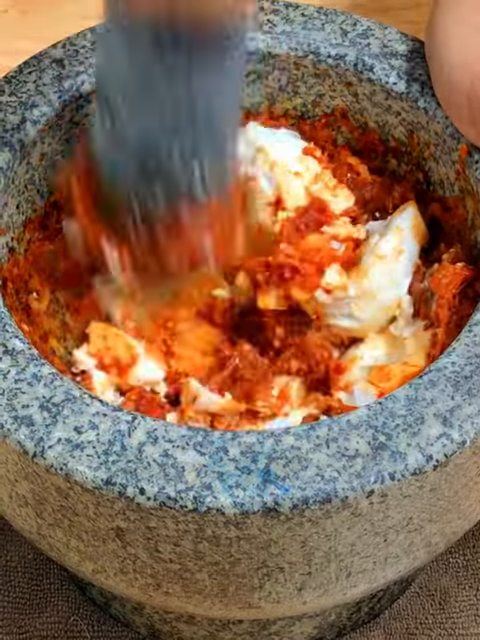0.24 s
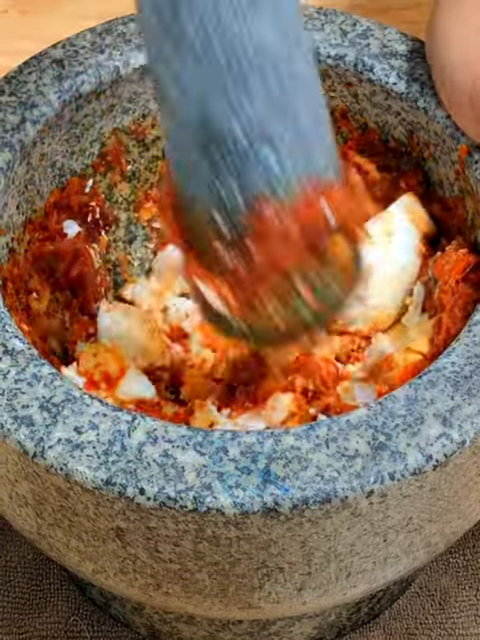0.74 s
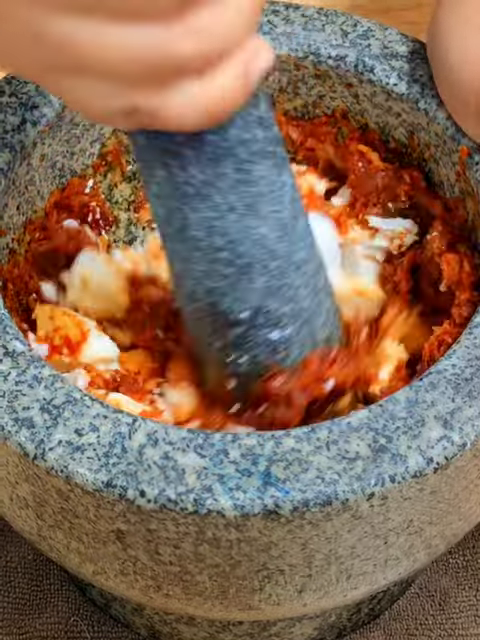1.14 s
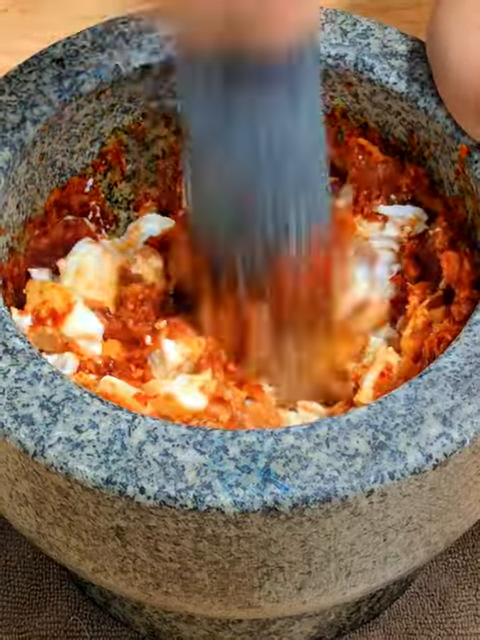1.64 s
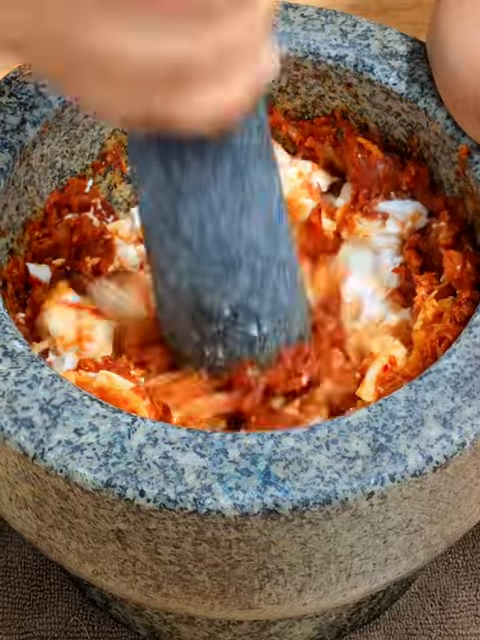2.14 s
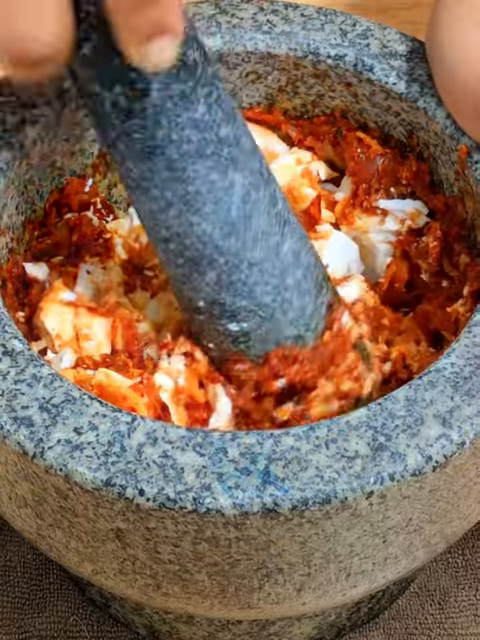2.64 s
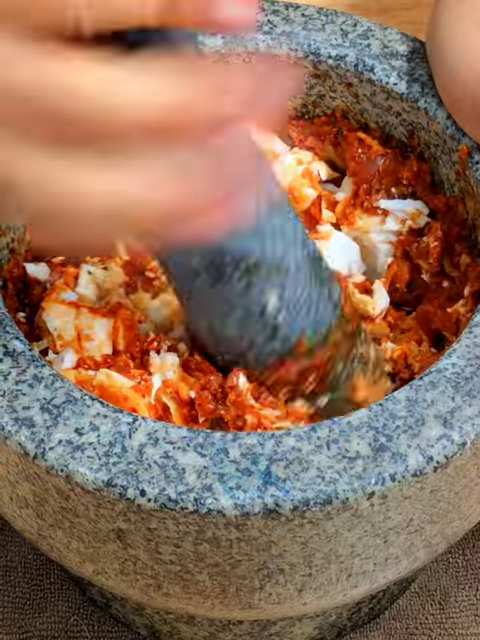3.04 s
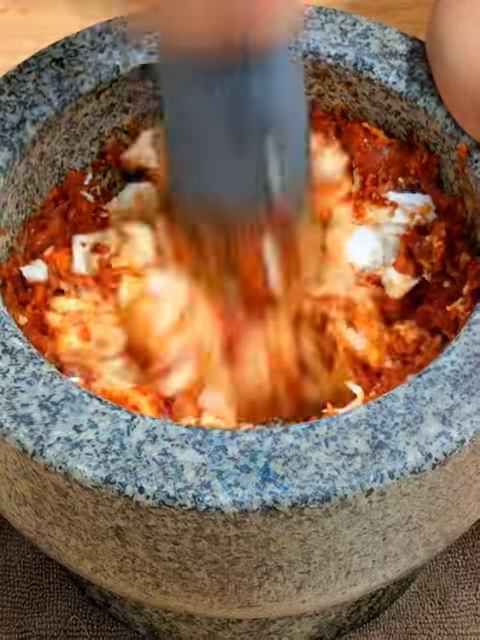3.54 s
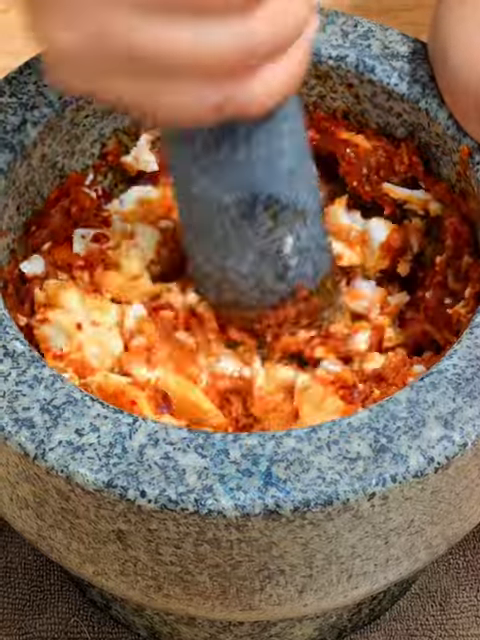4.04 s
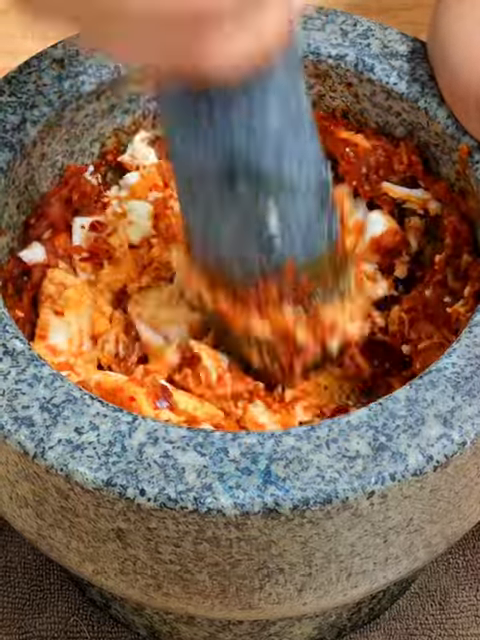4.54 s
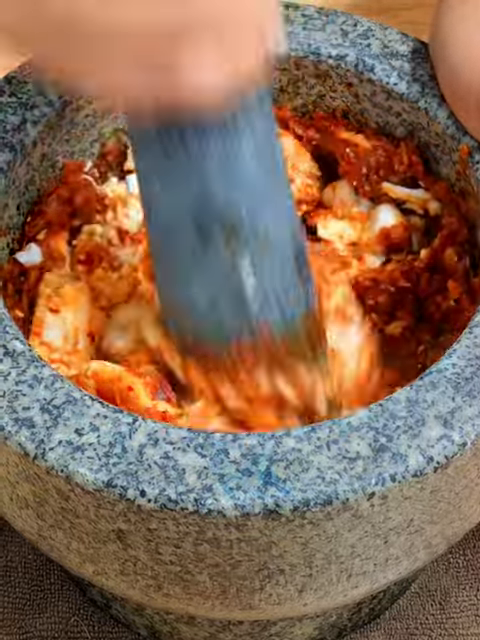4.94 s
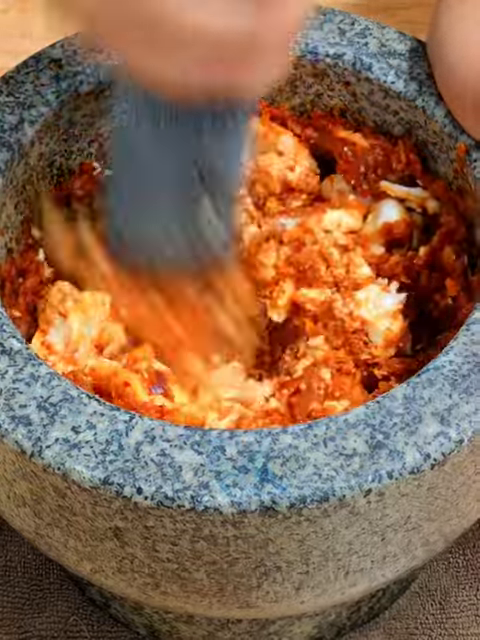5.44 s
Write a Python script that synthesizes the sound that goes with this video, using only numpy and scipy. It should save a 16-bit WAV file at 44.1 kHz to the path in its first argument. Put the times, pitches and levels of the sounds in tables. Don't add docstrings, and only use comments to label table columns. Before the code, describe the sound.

A stone pestle pounds wet, soft paste in a stone mortar, with squishy smacks, dull counter thuds and irregular sharp stone cracks.

```python
import sys
import numpy as np
from scipy import signal
from scipy.fft import rfft, irfft, next_fast_len
from scipy.io import wavfile
from scipy.ndimage import uniform_filter1d

SR = 44100
rng = np.random.default_rng(int(sys.argv[2]) if len(sys.argv) > 2 else 0)


def how_loud(loudness_db):
    steps = np.asarray(loudness_db, float) / 20
    return 10 ** steps


def log_audio(samples):
    frames = np.atleast_2d(samples).T
    limited = np.clip(frames, -1, 1)
    pcm = np.round(limited * 32767).astype(np.int16)
    wavfile.write(sys.argv[1], SR, pcm)


N = 251645

# f/Hz, level/dB per Hz
AIR_SPECTRUM = [(15, -46), (25, -21), (48, -24.5), (192, -8.5), (388, 1.5), (524, -11.5), (669, -10.5),
                (877, -9.5), (978, -13.5), (1930, -18.5), (4130, -31), (14400, -46.5), (16500, -50.5)]
# f/Hz, width/Hz, level/dB
HUM_PEAKS = [(150, 46, -71), (191.8, 12, -71), (264.3, 38, -66), (369.5, 23, -74), (447, 80, -70.5),
             (498, 37, -63)]
# f/Hz, t60/s
ROOM_DECAY = [(300, 0.43), (1000, 0.39), (2000, 0.23), (5000, 0.23), (13000, 0.21)]
# t/s, peak level/dB, deep level/dB, upper level/dB
COUNTER_BLOWS = [(0.166, -43.5, -61, -51), (0.292, -36.5, -51.5, -33.5), (0.478, -39, -44.5, -22),
                 (0.692, -37.5, -62, -48), (0.834, -29.5, -41.5, -23.5), (1.028, -41.5, -55.5, -52),
                 (1.184, -44, -59.5, -68), (1.39, -36, -57, -46.5), (1.529, -30, -48.5, -26.5),
                 (1.696, -40, -47, -23.5), (1.859, -53, -51.5, -29.5), (2.018, -39.5, -52.5, -50),
                 (2.201, -37, -48, -40), (2.369, -41, -59, -49), (2.533, -36, -52.5, -42.5),
                 (3.449, -34, -45.5, -28.5), (3.606, -33.5, -52.5, -38.5), (3.784, -34.5, -58.5, -43.5),
                 (3.899, -38.5, -56.5, -47), (4.062, -40.5, -54, -32.5), (4.156, -41.5, -53, -44.5),
                 (4.369, -41, -51.5, -45.5), (4.523, -38.5, -48, -40.5), (4.688, -39, -55.5, -46.5),
                 (4.847, -32.5, -51, -36.5), (5.067, -39.5, -62, -48), (5.17, -43.5, -58, -51),
                 (5.306, -39, -61, -36.5), (5.475, -32, -47.5, -32.5), (5.669, -37.5, -51, -45)]
# f/Hz, level/dB, t60/s
DEEP_MODES = [(113.5, 1, 0.064), (145.6, 4, 0.11), (186.6, -14, 0.99)]
COUNTER_MODES = [(271.84, 0, 0.48), (261.2, -6, 0.54), (293, -7, 0.4), (363.8, -3, 0.34),
                 (386.2, -6.5, 0.49)]
UPPER_MODES = [(430, -7, .16), (492, -3, .12), (547, 0, .155), (590, -6, .07), (635, -7, .08),
               (716, -8, .09)]
# f/Hz, level/dB per Hz
PASTE_SPECTRUM = [(590, -47), (1000, -2), (1620, -2), (3600, -7), (4750, -4), (7810, -5.5), (9080, -7),
                  (15100, -8), (15800, -22)]
# plunge t/s, plunge fizz level/dB, squeeze delay t/s, squeeze fizz level/dB, smack f/Hz
FIRST_GRIP_STROKES = [(0.115, -56.5, 0.052, -59, 11100), (0.4625, -48, .05, -70, 5040),
                      (.632, -51, 0.041, -55, 5030), (0.809, -50.5, 0.067, -57.5, 8100),
                      (0.9888, -55.5, 0.046, -54.5, 7350), (1.161, -55.5, .047, -52.5, 4040),
                      (1.3297, -49, 0.048, -56.5, 3070), (1.507, -46.5, .035, -73, 7000),
                      (1.679, -56, 0.036, -53, 4470), (1.843, -51, 0.049, -54.5, 7100),
                      (2.003, -57, .043, -56.5, 3060), (2.1697, -52, 0.034, -50.5, 4200),
                      (2.3308, -50, 0.049, -59.5, 3390), (2.4925, -54, 0.048, -65, 3680),
                      (2.6957, -59, 0.058, -70, 10200)]
SECOND_GRIP_STROKES = [(3.099, -63, 0.022, -54.5, 5560), (3.262, -53.5, 0.034, -55, 5300),
                       (3.422, -55, 0.032, -53, 8050), (3.568, -55, 0.059, -53, 5140),
                       (3.745, -52.5, 0.03, -51, 7100), (3.887, -51.5, 0.053, -55, 3600),
                       (4.0355, -57, .059, -53.5, 2970), (4.2026, -53, 0.041, -49.5, 3530),
                       (4.3534, -53, 0.037, -50.5, 5400), (4.510, -54.5, 0.031, -53.5, 4590),
                       (4.648, -58, 0.028, -54, 5070), (4.8215, -54, .047, -52.5, 4650),
                       (4.969, -55.5, 0.044, -55.5, 4760), (5.128, -51.5, 0.058, -53.5, 4660),
                       (5.287, -57.5, 0.07, -56, 9100), (5.6222, -57, 0.027, -50.5, 5670)]
# t/s, fizz level/dB, smack f/Hz, smack above fizz level/dB
STRAY_SMACKS = [(0.644, -54, 5900, 3.5), (0.699, -62, 8000, 12), (1.0161, -71, 7390, 10),
                (1.063, -64, 7900, 18.5), (1.19, -62, 5500, 14), (1.3287, -63, 7700, 18),
                (1.3795, -64, 3100, 19), (3.117, -63.5, 5600, 20), (.004, -63.5, 3300, 13),
                (2.016, -53, 3100, 6), (2.073, -69, 7920, 15), (2.823, -68, 3330, 6),
                (2.929, -65.5, 9000, 6), (3.5957, -52.5, 3080, -7), (3.7765, -60.5, 6850, 25.5),
                (4.0507, -47, 6070, 3), (4.133, -65, 10500, 18), (4.2438, -60.5, 3250, 24),
                (4.3924, -65, 5400, 21), (4.708, -49, 5320, 5), (4.8, -59, 5000, 0), (4.9923, -53, 3220, 5),
                (5.516, -53, 11100, 7), (5.669, -46, 4180, 12.5)]
# t/s, peak level/dB, ring f/Hz, lasting tone relative level/dB
PESTLE_PINGS = [
    (0.2884, -28, 6080, -13),
    (0.4785, -27.5, 6250, -16),
    (1.857, -43.5, 6280, -8),
    (3.4423, -48, 6000, -19),
    (5.2993, -51, 6100, -27),
    (5.471, -17.5, 6100, -27),
]
# f/ring f, level/dB, t60/s
PESTLE_MODES = [(.98, 6, 0.013), (1.002, 0.5, 0.022), (1.03, -2, 0.017), (1.2, -10, 0.0083),
                (.62, -21, .008), (.8, -13, .006), (1.715, -35, .08), (2.11, -23, 0.011),
                (2.57, -21, 0.013)]
# t/s, knock peak level/dB, sharp edge level/dB, bowl level/dB, knock f/Hz
STONE_KNOCKS = [(0.2883, -22.5, -19.5, -42, 1596), (0.4776, -15.5, -10, -19.5, 1508),
                (0.8272, -10.5, -10.5, -16, 1810), (1.523, -13.5, -40, -22.5, 2100),
                (1.6909, -17, -20.5, -24, 1746), (1.858, -24.5, -27.5, -28, 1455),
                (2.172, -70, -43.5, -50, 1910), (2.2035, -67, -44.5, -49, 1880),
                (2.3332, -43.5, -45, -58, 1570), (3.4432, -26.5, -27.5, -27.5, 1360),
                (3.5958, -36.5, -66.5, -40, 1552), (3.745, -38.5, -59, -45, 1670),
                (4.0583, -31.5, -47, -35.5, 1480), (4.5201, -52, -46, -49, 1630),
                (4.841, -59, -57, -50, 1440), (5.2981, -25, -35, -33.5, 1960),
                (5.471, -18.5, -15.5, -31, 1930)]
# f/Hz, level/dB, t60/s
BOWL_MODES = [(905, -11, 0.2), (958, -11.5, 0.23), (1205, -8.5, 0.11), (1246, 2, 0.14), (1387, -4, 0.065),
              (1494, -6, 0.092), (1540, 0.5, 0.13), (1697, -8, 0.086), (1745, -1.5, 0.076),
              (1826, -2, 0.17), (1924, -5.5, 0.16), (2032, -5, 0.067), (2160, -16, 0.07), (2486, -17, .1)]
RIM_MODES = [(10480, 0, .02), (10200, -1, .012)]
WALL_MODES = [(637, 13.5, 0.014), (815, -0.5, 0.044), (1010, 1, 0.013)]
LIP_MODES = [(3080, 0, .007), (3330, -4, .012), (4400, -6, .006)]
# f/Hz, level/dB per Hz
GRIT_SPECTRUM = [(350, -43.5), (600, -11), (1610, -8), (3300, -12), (4980, -2), (6370, -4), (8050, -71.5),
                 (10300, -10), (12800, -39), (16000, -28)]
# f/Hz, width/Hz, depth (0-1)
BOWL_DIPS = [(1104, 75, 0.32), (2750, 460, 0.26)]

# smack above fizz level/dB, lower part relative level/dB, t60/s, rise t/s
PLUNGE, SQUEEZE = (2.5, -0.81, 0.15, 0.008), (7.9, 3.2, 0.095, 0.005)
STRAY, SPLASH = (0, -2, 0.068, 0.003), (0, 6.8, 0.03, 0.0008)
SPLASH_DB = -31
CREEP_DB, CREEP_RISE_S, CREEP_T60_S, REST_DB = -8, 0.005, 0.09, -81
FADE_BEND = 1.415
FLICKER_DB, FLICKER_S = 2.2, 0.005
DULL_DB_PER_OCTAVE = -16
SNAP_SAMPLES = 400


def evened(x):
    return x / np.sqrt(np.mean(x ** 2) + 1e-20)


def read(points, hz):
    f, value = np.transpose(points)
    return np.interp(np.log(hz + 1), np.log(f + 1), value)


def add(mix, s, sound):
    part = mix[max(round(s * SR), 0):][:len(sound)]
    part += sound[:len(part)]


def coloured(x, points):
    size = next_fast_len(len(x))
    gain = how_loud(read(points, np.fft.rfftfreq(size, 1 / SR)))
    return irfft(rfft(x, size) * gain, size)[:len(x)]


def ring(modes, rise_s, spread_db):
    t = np.arange(round(max(mode[2] for mode in modes) * SR)) / SR
    out = np.zeros(len(t))
    for hz, db, t60 in modes:
        share, phase = rng.random(2)
        level_db = db + spread_db * (2 * share - 1)
        out += how_loud(level_db - 60 * t / t60) * np.sin(2 * np.pi * (hz * t + phase))
    out = out * (1 - np.exp(-(t / rise_s) ** 2))
    return out / abs(out).max()


def hum():
    out = how_loud(AIR_DB - 2.5) * evened(coloured(rng.standard_normal(N), AIR_SPECTRUM))
    turn = 2j * np.pi * np.arange(N) / SR
    for hz, width, db in HUM_PEAKS:
        r = np.exp(-np.pi * width / SR)
        slow = rng.standard_normal(N) + 1j * rng.standard_normal(N)
        slow = signal.lfilter([1 - r], [1, -r], slow)
        slow = signal.lfilter([1 - r], [1, -r ** 3], slow)
        out = out + how_loud(db) * evened((slow * np.exp(turn * hz)).real)
    return out


AIR_DB = -55.5


def kitchen(x, count=3, turns_per_s=1.677):
    out, at = np.zeros(N), np.arange(130, SR // 2 - 20, 14)
    for k in range(count):
        taps = np.zeros(SR // 2)
        taps[at + rng.integers(0, 14, len(at))] = rng.choice([-1.0, 1.0], len(at))
        hz, t, z = signal.stft(taps, SR, nperseg=256)
        decay = how_loud(-60 * t / read(ROOM_DECAY, hz)[:, None])
        tail = signal.istft(z * decay, SR, nperseg=256)[1]
        angle = np.pi * (turns_per_s * np.arange(N) / SR + k / count)
        share = np.sqrt(2 / count) * np.cos(angle)
        out += signal.fftconvolve(x * share, tail / np.linalg.norm(tail))[:N]
    return out


def thuds():
    out = np.zeros(N)
    for s, db, deep_db, upper_db in COUNTER_BLOWS:
        cushion = np.clip((-34 - upper_db) / 8, 1, 2.5)
        dulling = DULL_DB_PER_OCTAVE * (cushion - 1)
        upper = [(hz, level + dulling * np.log2(hz / UPPER_MODES[0][0]), t60)
                 for hz, level, t60 in UPPER_MODES]
        add(out, s + 0.00093, how_loud(deep_db + 7.5) * ring(DEEP_MODES, rise_s=0.0068, spread_db=3.0))
        add(out, s - 0.004, how_loud(db - 3.5) * ring(COUNTER_MODES, rise_s=0.0033 * cushion, spread_db=-6.0))
        add(out, s - 0.002, how_loud(upper_db - 1.5) * ring(upper, rise_s=0.0015 * cushion, spread_db=-5.0))
    return out


def bursts():
    strokes = FIRST_GRIP_STROKES + SECOND_GRIP_STROKES
    pitch = 2360.0 * 4.0 ** rng.random(len(strokes))
    plunges = [(row[0], row[1], hz, PLUNGE) for row, hz in zip(strokes, pitch)]
    squeezes = [(s + after, db, hz, SQUEEZE) for s, _, after, db, hz in strokes]
    strays = [(s, db, hz, (above_db, *STRAY[1:])) for s, db, hz, above_db in STRAY_SMACKS]
    return plunges + squeezes + strays


def bubbles(per_s=610.0, count=14):
    out, t = np.zeros(N), np.arange(SNAP_SAMPLES // 2) / SR
    size = how_loud(6.5 * np.minimum(rng.exponential(1, N), 3)) * (rng.random(N) < per_s / SR)
    kind = rng.integers(0, count, N)
    for k, hz in enumerate(np.geomspace(1700, 13000, count)):
        pop = np.sin(2 * np.pi * hz * t) * (1 - np.exp(-t * hz)) * np.exp(-t * hz / 1.9)
        out = out + signal.oaconvolve(size * (kind == k), pop * np.sqrt(hz))[:N]
    return evened(out)


def squelch(events, per_s=2500.0, lumpy_db=4.5):
    pops = rng.standard_normal(N) * (rng.random(N) < per_s / SR)
    pops = pops * how_loud(lumpy_db * np.minimum(rng.exponential(1, N), 4))
    fizz = coloured(evened(pops) + 0.59 * bubbles() + rng.standard_normal(N), PASTE_SPECTRUM)
    flicker, span = rng.standard_normal(N), round(FLICKER_S * SR)
    flicker = uniform_filter1d(uniform_filter1d(flicker, span), span)
    fizz = fizz * how_loud(FLICKER_DB * evened(flicker))
    low = signal.sosfiltfilt(signal.butter(2, 5500, fs=SR, output="sos"), fizz)
    high = fizz - low

    creep, u = np.full(N, how_loud(REST_DB) ** 2), np.arange(SR // 4) / SR
    for s, db, *_ in FIRST_GRIP_STROKES + SECOND_GRIP_STROKES:
        closing = how_loud(db + CREEP_DB - 60 * u / CREEP_T60_S) * (1 - np.exp(-u / CREEP_RISE_S))
        add(creep, s, closing ** 2)
    high_power, low_power = creep.copy(), creep.copy()
    splashes = [(s + 0.0018, max(knock_db, edge_db) + SPLASH_DB, 0, SPLASH)
                for s, knock_db, edge_db, *_ in STONE_KNOCKS]
    for s, fizz_db, _, (_, low_db, t60, rise_s) in events + splashes:
        fade = how_loud(fizz_db - 6.5 - 60 * (u / t60) ** FADE_BEND)
        burst = (fade * (1 - np.exp(-(u / rise_s) ** 2))) ** 2
        add(high_power, s - rise_s, burst)
        add(low_power, s - rise_s, burst * how_loud(2 * low_db))
    return (high * np.sqrt(high_power) + low * np.sqrt(low_power)) / np.std(high)


def smacks(events):
    out, t = np.zeros(N), np.arange(SNAP_SAMPLES) / SR
    for s, db, hz, (above_db, *_) in events:
        tick = rng.standard_normal(len(t)) * np.exp(-t / 0.0024)
        pop = np.sin(2 * np.pi * hz * t * (1 + 30 * t))
        pop = pop * (1 - np.exp(-t * hz)) * np.exp(-t * hz / 2.3)
        add(out, s, how_loud(db + above_db - 0.5) * (1.95 * pop + 0.27 * np.diff(tick, prepend=0)))
    return out


def pings():
    out = np.zeros(N)
    for s, db, hz, tone_db in PESTLE_PINGS:
        modes = [(hz * k, mode_db, t60) for k, mode_db, t60 in PESTLE_MODES] + [(hz, tone_db, 0.17)]
        add(out, s, how_loud(db) * ring(modes, rise_s=0.00014, spread_db=0.5))
    return out


def crack(hz, glide, life_s):
    t = np.arange(SNAP_SAMPLES) / SR
    turns = np.cumsum(hz * (0.85 + 0.42 * np.exp(-glide * t))) / SR
    snap = np.sin(2 * np.pi * turns) * (t / life_s) ** 1.2 * np.exp(-t / life_s)
    return snap / abs(snap).max()


def hollowed(x):
    for hz, width, depth in BOWL_DIPS:
        x = x - depth * signal.lfilter(*signal.iirpeak(hz, hz / width, SR), x)
    return x


def knocks():
    sharp, rung, t = np.zeros(N), np.zeros(N), np.arange(SNAP_SAMPLES) / SR
    for s, knock_db, edge_db, bowl_db, hz in STONE_KNOCKS:
        peak_db = max(edge_db, knock_db)
        grit = evened(coloured(rng.standard_normal(len(t)), GRIT_SPECTRUM)) * np.exp(-t / 0.0014)
        edge = crack(3180.0, glide=3900.0, life_s=0.00017) + 0.13 * grit
        add(sharp, s + 0.000099, how_loud(knock_db) * crack(hz, glide=2260.0, life_s=0.0003))
        add(sharp, s, how_loud(edge_db) * edge)
        add(sharp, s, how_loud(peak_db - 34) * ring(RIM_MODES, rise_s=0.0003, spread_db=1.5))
        add(sharp, s + 0.00075, how_loud(peak_db - 19) * ring(WALL_MODES, rise_s=0.0032, spread_db=-8.5))
        add(sharp, s, how_loud(edge_db - 9.5) * ring(LIP_MODES, rise_s=0.00023, spread_db=4.0))
        body = [(hz * 1.2, 0, 0.045), (hz * 0.98, -3, 0.035), (hz * 0.67, -4, 0.04)]
        add(rung, s + 0.001916, how_loud(knock_db - 13.5) * ring(body, rise_s=0.00075, spread_db=-3.0))
        add(rung, s, how_loud(bowl_db - 5.0) * ring(BOWL_MODES, rise_s=0.002, spread_db=-3.5))
    return hollowed(sharp), rung


def scene():
    sharp, rung = knocks()
    ping, low = pings(), thuds()
    events = bursts()
    wet = squelch(events) + smacks(events)
    sent = how_loud(-6) * sharp + how_loud(-3.5) * ping + how_loud(-14.5) * rung + how_loud(-7.5) * low + how_loud(-10) * wet
    return (sharp + ping + rung + low + wet + kitchen(sent) + hum())[None]


def roll_off(x):
    return signal.sosfilt(signal.butter(12, 16640, fs=SR, output="sos"), x)


def record(dry):
    cut = signal.sosfilt(signal.butter(3, 62, "high", fs=SR, output="sos"), dry)
    cut = signal.sosfilt(signal.cheby2(12, 22, 16050, fs=SR, output="sos"), cut)
    return roll_off(cut)


dry = scene()
out = record(dry)
log_audio(out)
```